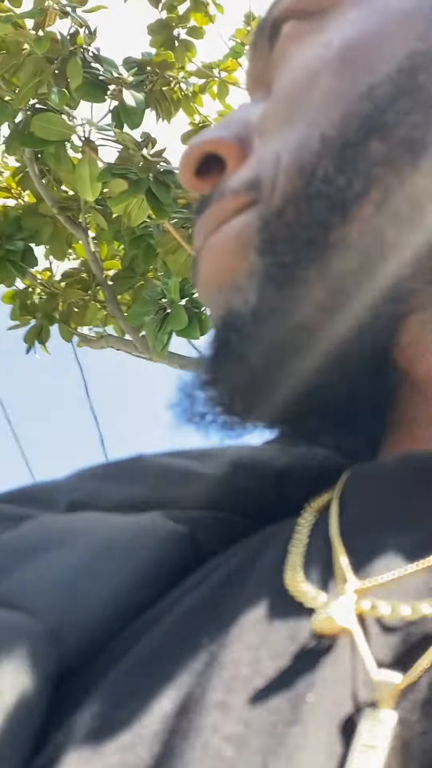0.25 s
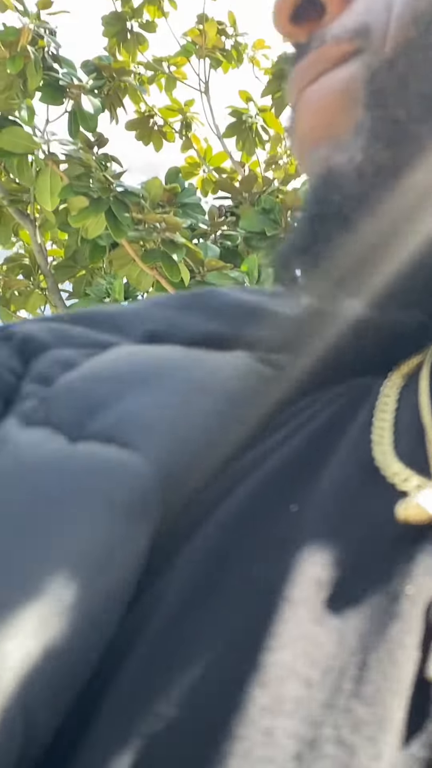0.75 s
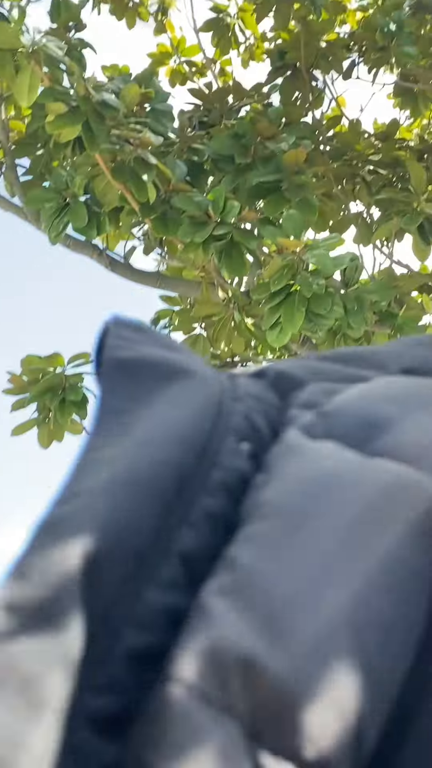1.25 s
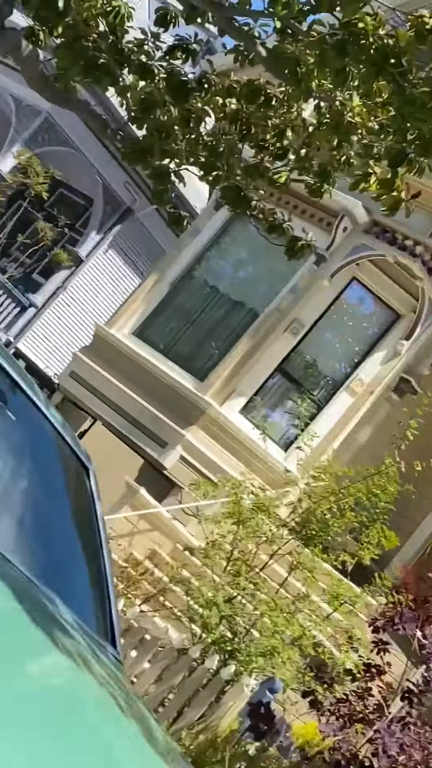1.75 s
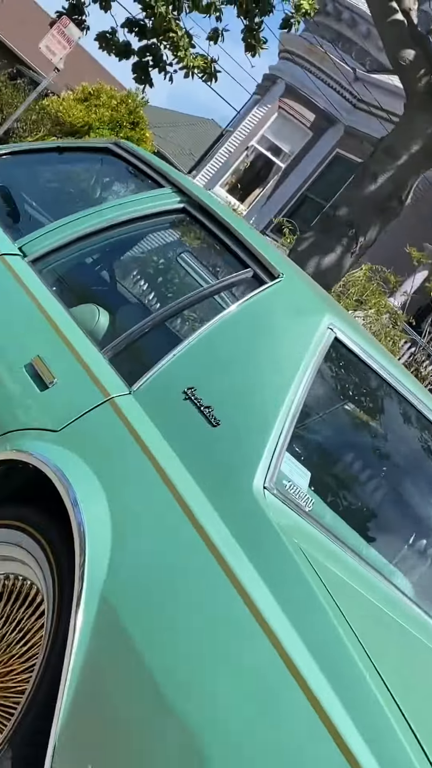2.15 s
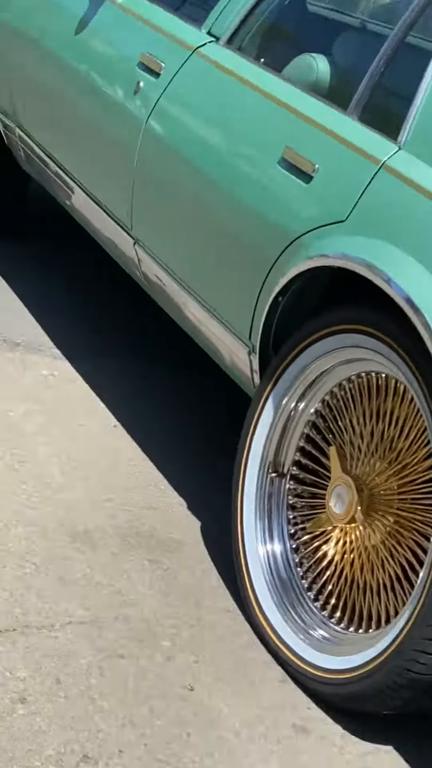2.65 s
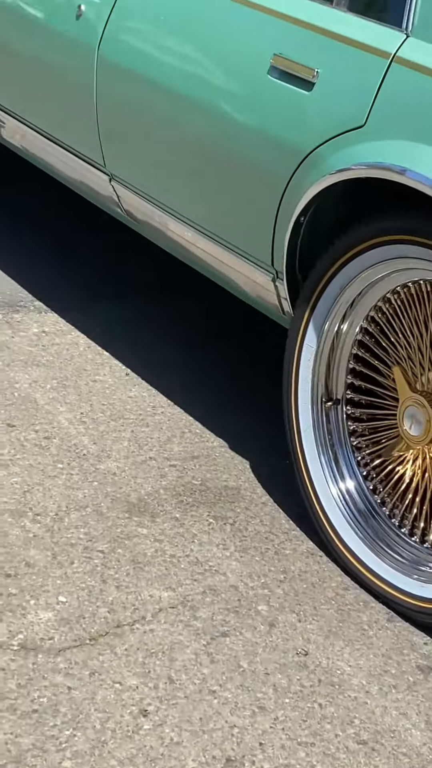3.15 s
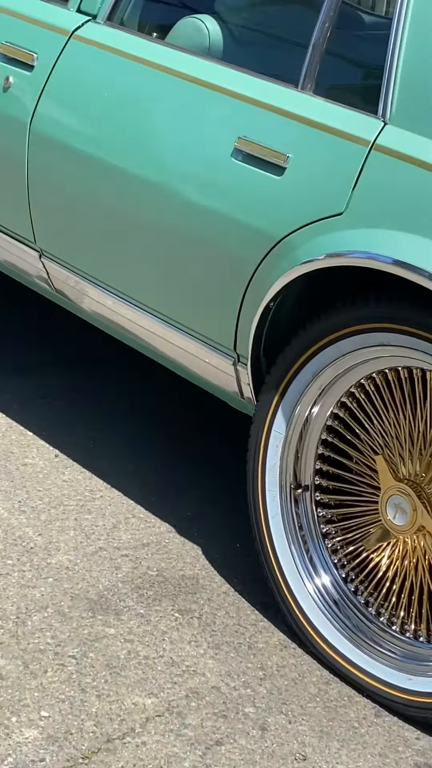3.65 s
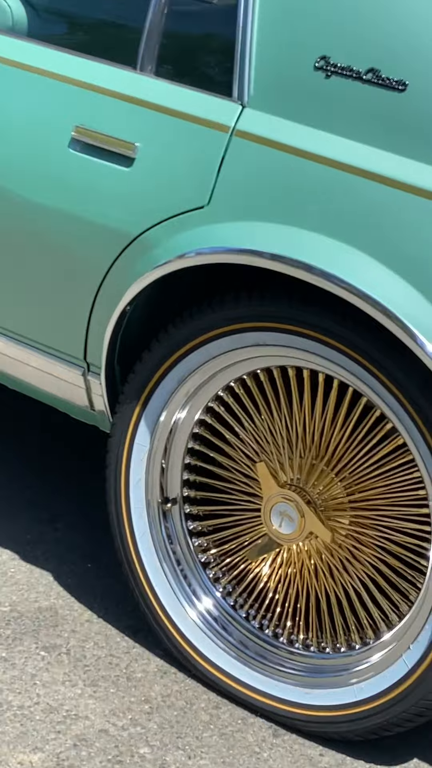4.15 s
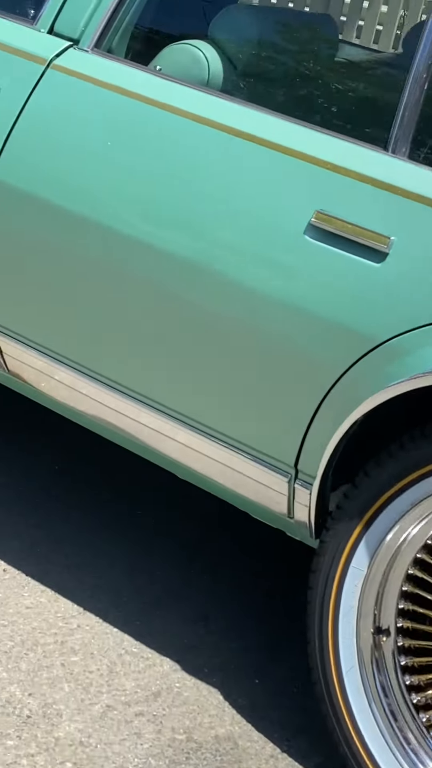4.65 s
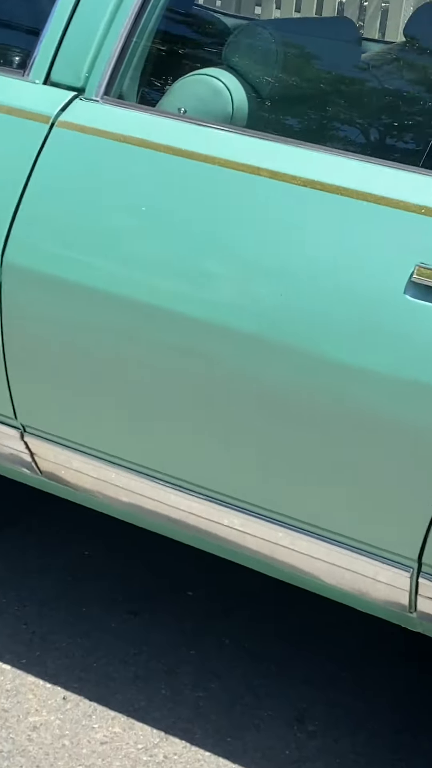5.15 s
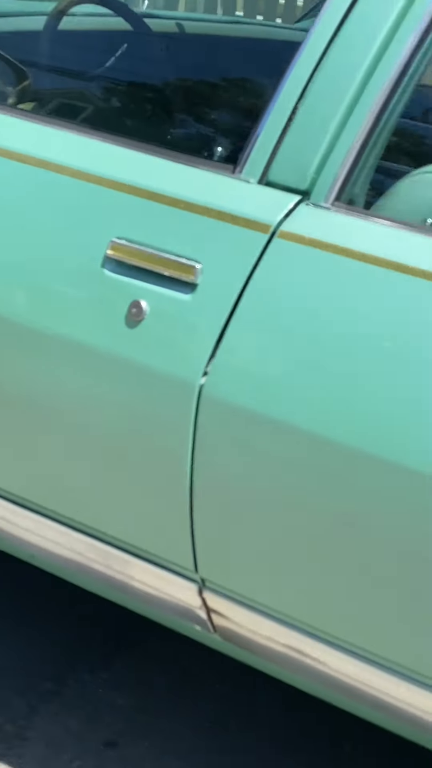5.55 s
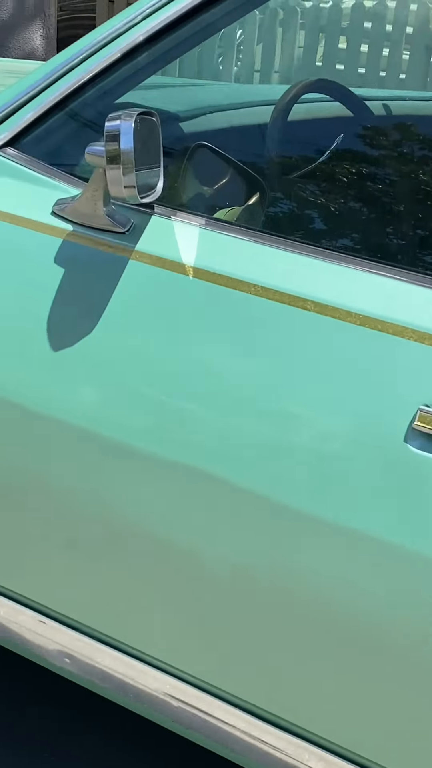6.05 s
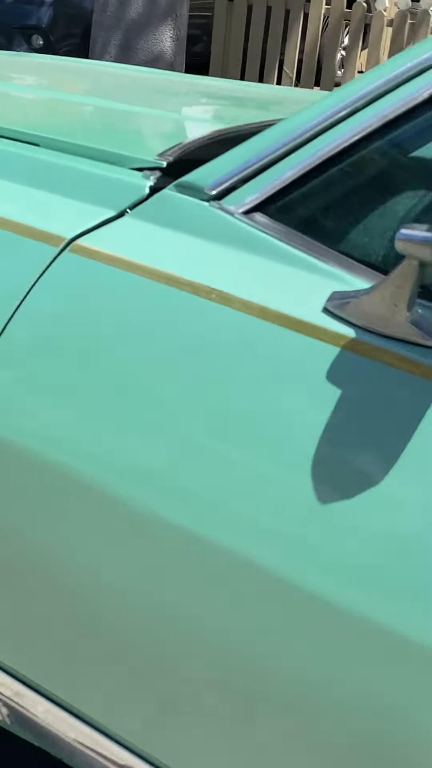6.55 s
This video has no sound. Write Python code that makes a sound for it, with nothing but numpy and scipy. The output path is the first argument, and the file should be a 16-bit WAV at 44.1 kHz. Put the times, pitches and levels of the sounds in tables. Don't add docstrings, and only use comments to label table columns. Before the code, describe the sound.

A big car engine idles in a deep throbbing drone outdoors, hiss growing brighter as the phone moves along, with finger knocks on its body.

```python
import sys
import numpy as np
from scipy import signal
from scipy.fft import rfft, irfft
from scipy.io import wavfile
from scipy.ndimage import uniform_filter1d

SR = 44100
rng = np.random.default_rng(int(sys.argv[2]) if len(sys.argv) > 2 else 0)


def waveform_to_disk(signal):
    frames = np.transpose(np.atleast_2d(signal))
    scaled = np.clip(frames, -1, 1) * 32767
    samples = np.round(scaled).astype(np.int16)
    wavfile.write(sys.argv[1], SR, samples)


def gain_from_db(level_db):
    decades = np.asarray(level_db, float) / 20
    return 10 ** decades


N = 299086

# time in seconds, nearness to the engine bay 0-1,
# clear view of the tailpipe 0-1, microphone ports aimed at the open street 0-1.
WALK_PATH = [
    (0, 0.02, 0.02, 0.3),
    (.6, 0.11, 0.1, 0),
    (.95, 0.13, 0.42, 0.6),
    (1.5, 0.26, 0.85, 0.9),
    (2.1, 0.66, 0.85, 0.1),
    (2.8, 0.59, 0.92, 0.46),
    (3.9, 0.76, 0.85, 0.1),
    (5.2, 0.97, 0.62, 0),
    (5.7, 0.95, 0.6, .4),
    (6.79, .97, 0.03, 0.47),
]
# start in seconds, peak in dB, pitch in Hz, length in cycles.
FINGER_KNOCKS = [(1.012, -19, 467, 4.3), (1.506, -24, 509, 5.0), (1.635, -10, 490, 4.3),
                 (1.822, -25, 500, 5.1), (1.901, -16.5, 498, 3.7), (1.965, -26.5, 530, 9.1),
                 (2.003, -32.5, 506, 5.6), (2.074, -26, 549, 5.7), (2.159, -26, 475, 12),
                 (2.235, -24.5, 538, 5.3), (2.298, -32, 573, 4.6), (2.42, -20, 507, 5),
                 (2.441, -24, 547, 5.1), (2.465, -23.5, 503, 8.5), (2.553, -28.5, 479, 8.6),
                 (2.59, -24, 496, 5.0), (2.609, -30, 567, 8.5), (2.903, -24, 506, 4.4),
                 (4.418, -33, 514, 8.5), (4.836, -25, 580, 4.6), (6.42, -29, 560, 6.),
                 (6.505, -27, 502, 6.)]
BOOM_DELAY = (.1374, -.73)


def evened(x):
    return x / np.sqrt(np.mean(x ** 2) + 1e-20)


def read(points, hz):
    f, value = np.transpose(points)
    return np.interp(np.log(hz + 1), np.log(f + 1), value)


def along(rows, t):
    s, *columns = np.transpose(rows)
    return [np.interp(t, s, column) for column in columns]


def add(mix, s, sound):
    part = mix[round(s * SR):][:len(sound)]
    part += sound[:len(part)]


def wander(hz):
    draws = rng.standard_normal(N // 100 + 402)
    smooth = signal.filtfilt(*signal.butter(2, hz * 200 / SR), draws)
    return evened(smooth[200:-200])


def stretched(slow):
    return np.interp(np.arange(N) / 100, np.arange(len(slow)), slow)


def pipe_gain(hz, mean_hz, pipe):
    centre_hz, width_hz = pipe
    mean_loss = 1 + (2 * (mean_hz - centre_hz) / width_hz) ** 2
    loss = 1 + (2 * (hz - centre_hz) / width_hz) ** 2
    return np.sqrt(mean_loss / loss)


def orders(table, cycles, lag, rough, drift, pipe=(0, 1e9)):
    mean_rpm = 956
    delay, turn = lag
    out = np.zeros(N)
    burn = 1 + rough * (wander(5.7) + 1j * wander(10.0))
    cycle_hz = np.pad(np.gradient(cycles)[::100] * SR, (0, 2), "edge")[:len(burn)]
    for k, db, sign in table:
        shake = burn + drift * (wander(4.4) + 1j * wander(2.4))
        shake = stretched(shake * pipe_gain(k * cycle_hz, k * mean_rpm / 120, pipe))
        line = sign * shake * np.exp(1j * (2 * np.pi * k * (cycles - delay) + turn))
        out += np.sqrt(2) * gain_from_db(db) * line.real
    return out


def crank_cycles():
    # time in seconds, crank speed in rpm.
    idle_speed = [(0, 960.9), (.59, 960), (.7, 978), (.83, 954.7), (1.7, 947.8), (2.08, 982), (2.54, 933.5),
                  (2.9, 963), (3.68, 941.7), (3.87, 959.5), (4.38, 963.2), (4.55, 939.3), (5.17, 967.5),
                  (5.81, 943.7), (6.14, 971.6), (6.32, 968.8), (6.62, 945.3), (6.79, 950)]
    rpm = along(idle_speed, np.arange(N) / SR)[0]
    return np.cumsum(rpm) / (120 * SR)


def whine():
    # frequency in Hz, level in dB.
    lines = [(11896, -87.5), (12104, -88)]
    t = np.arange(N) / SR
    return sum(np.sqrt(2) * gain_from_db(db) * np.sin(2 * np.pi * hz * t) for hz, db in lines)


def steps():
    # start in seconds, peak in dB, pitch in Hz.
    footfalls = [
        (2.53, -24.5, 47.5),
        (4.422, -26, 52.5),
        (5.599, -17.5, 54.8),
    ]
    rise_s = .022
    out, t = np.zeros(N), np.arange(6000) / SR
    for s, db, hz in footfalls:
        swell = t / rise_s * np.exp(1 - t / rise_s)
        add(out, s, gain_from_db(db) * swell * np.sin(2 * np.pi * hz * t))
    return out


def knocks():
    thump_db, thump_pitch = -9, .55
    out = np.zeros(N)
    for s, db, hz, turns in FINGER_KNOCKS:
        u = np.arange(0, 1, hz / (SR * max(turns, 2)))
        body = np.cos(2 * np.pi * turns * u - .9)
        shove = gain_from_db(thump_db) * np.sin(2 * np.pi * thump_pitch * turns * u - .6)
        add(out, s - .0015, gain_from_db(db) * np.sin(np.pi * u ** 0.74) ** 2 * (body + shove))
    return out


def rubbing():
    # start in seconds, level in dB, centre in Hz.
    scrapes = [
        (1.9602, -32.5, 890),
        (4.035, -31.5, 1310),
        (4.044, -30, 1000),
    ]
    start_s, rise_s, end_s, fall_s = 1.5, 0.36, 2.63, .04
    rub_db, width_hz = -42.5, 170
    t = np.arange(N) / SR
    hz = along(FINGER_KNOCKS, t)[1]
    press = np.clip((t - start_s) / rise_s, 0, 1) * np.clip((end_s - t) / fall_s + 1, 0, 1)
    slips = rng.standard_normal(N) * gain_from_db(3.5 * stretched(wander(45.)))
    turn = np.exp(2j * np.pi * np.cumsum(hz) / SR)
    r = np.exp(-np.pi * width_hz / SR)
    body = (turn * signal.lfilter([1], np.poly([r, r]), slips / turn)).real
    out = gain_from_db(rub_db) * press * evened(body)
    for s, db, centre_hz in scrapes:
        band = signal.butter(2, [centre_hz * .5, centre_hz * 1.6], "bandpass", fs=SR)
        puff = evened(signal.lfilter(*band, rng.standard_normal(250)))
        add(out, s, gain_from_db(db) * puff * np.hanning(250))
    return out


def accessories(cycles):
    # order of the two-turn cycle, level in dB, polarity.
    fan_blades = [(47, -5, 1), (48, 0, 1)]
    # frequency in Hz, level in dB.
    pump_tones = [(1253, -63), (1336, -60), (1657, -63), (2432, -64), (2538, -62.5), (2605, -63)]
    fan_db, fan_far_db, pump_far_db = -45, -9.5, -14
    t = np.arange(N) / SR
    near, view, _ = along(WALK_PATH, t)
    fan = orders(fan_blades, cycles, BOOM_DELAY, rough=.2, drift=0.28)
    fan *= gain_from_db(fan_db + fan_far_db * (1 - near * (1 - view)))
    pump = orders([(hz, db, 1) for hz, db in pump_tones], t, (0, 0), rough=.2, drift=.4)
    return fan + gain_from_db(pump_far_db * (1 - near)) * pump


def engine_noise(cycles):
    # frequency in Hz, density in dB per Hz.
    tail_spectrum = [(50, -44.5), (75, -40.5), (135, -53), (170, -62), (250, -55.5), (340, -63.5),
                     (500, -76), (750, -80), (1400, -87), (2500, -90.5), (5000, -96.5), (8000, -99.5),
                     (12000, -110), (15000, -124)]
    # frequency in Hz, density in dB per Hz.
    bonnet_spectrum = [(50, -62.5), (75, -42.5), (135, -47), (170, -54.5), (250, -53.5), (340, -64.5),
                       (500, -71), (750, -69.5), (1400, -74), (2500, -75.5), (5000, -80), (8000, -84.5),
                       (12000, -97.5), (15000, -107)]
    # centre in Hz, width in Hz, lift in dB.
    sheet_metal = [(72, 27, -6), (136, 22, -8), (243, 14, -8), (350, 16, -0.5), (376, 7.3, 3.5),
                   (560, 230, 4.5), (1400, 310, 1), (1520, 200, 1.5), (2166, 170, 3), (2694, 430, 3.5),
                   (5120, 810, 2)]
    patchy_db, flicker_db, aim_db, valves = 0.68, 0.46, 6.5, 0.047
    grille_db, grille_hz, grille_wide_hz = 1.5, 2350, 500

    frames, hz = N // 128 + 6, np.fft.rfftfreq(512, 1 / SR)
    near, view, aim = along(WALK_PATH, np.arange(frames) * 128 / SR)
    patches = rng.standard_normal((frames, 257)).T
    quick = uniform_filter1d(uniform_filter1d(patches, size=6, axis=0), size=24, axis=1)
    patches = evened(quick)
    slow = uniform_filter1d(uniform_filter1d(patches, size=8, axis=0), size=90, axis=1)
    patches += 0.59 * evened(slow)
    flicker = evened(uniform_filter1d(rng.standard_normal(frames), size=5))
    treble = np.clip(np.log2(hz / 700 + 1e-9), 0, 1)[:, None]
    top = np.clip(hz / 9000, 0, 1.5)[:, None]

    change_db = (near - 1) * (read(bonnet_spectrum, hz) - read(tail_spectrum, hz))[:, None]
    grille = np.exp(-((hz[:, None] - grille_hz) / grille_wide_hz) ** 2)
    change_db += grille_db * near * (1 - view) * grille
    change_db += aim_db * aim * top + patchy_db * patches + flicker_db * treble * flicker

    fine = np.fft.rfftfreq(N, 1 / SR)
    metal_db = sum(db / (1 + (2 * (fine - f) / w) ** 2) for f, w, db in sheet_metal)
    colour = gain_from_db(read(bonnet_spectrum, fine) + metal_db) * np.sqrt(SR / 2)
    colour *= np.clip(fine / 45, 0, 1) ** 2.4
    rush = irfft(rfft(rng.standard_normal((2, N))) * colour, N)
    z = signal.stft(rush, nperseg=512, noverlap=384)[2]
    z = z * gain_from_db(change_db)[:, :z.shape[2]]
    noise = signal.istft(z, nperseg=512, noverlap=384)[1][:, :N]
    return noise * (1 + valves * np.cos(2 * np.pi * (2 * cycles + 0.069)))


def exhaust(cycles):
    # order of the two-turn cycle, level in dB,
    # polarity (1j is a quarter turn ahead).
    main_boom = [(12, -13.5, 1), (13, 0, 1), (14, -19, -1), (15, -26, -1)]
    beating_boom = [(10, -16, -1), (11, 0, 1)]
    even_firing = [(5, -53, 1), (6, -46, -1), (7, -46, -1), (8, -29.7, 1), (19, -52, 1), (21, -50, 1)]
    burble_orders = [(24, -7, 1), (25, -9, 1j), (26, -3, 1), (27, -10, 1), (28, -13, 1)]
    ring_orders = [(34, -11, 1), (36, 0, 1), (37, -6, 1)]
    burble_delay = (.5332, .8)
    # centre in Hz, width in Hz.
    tailpipe = (203, 12.)
    silencer = (289, 11)
    # time in seconds, burn strength in dB, weaker bank against the stronger in dB.
    burn_strength = [(0, -9.5, -10.5), (.25, -13.5, -4.5), (.91, -13.5, -6), (1.08, -13, -13),
                     (1.56, -15, -10.5), (2.13, -17, -.3), (2.39, -14.5, -13), (2.96, -17.5, -2.5),
                     (3.11, -15, -7.5), (3.55, -18.5, -7.5), (3.9, -15.5, -9), (4.27, -17.5, -9.5),
                     (4.51, -16.5, -10.5), (4.79, -16, -11), (5.35, -15.5, -11), (5.72, -18, -8),
                     (6, -18.5, 0.5), (6.79, -14, -10)]
    # time in seconds, depth 0-1, half length in seconds.
    weak_burns = [
        (4.459, 0.8, 0.021),
        (5.567, 0.93, 0.012),
    ]
    t = np.arange(N) / SR
    main_db, weaker_db = along(burn_strength, t)
    near, view, _ = along(WALK_PATH, t)
    hidden = 1 - view
    burble_db = -26 - 16.5 * hidden
    ring_db = -38 - 5.5 * hidden + 3.5 * (near - .5)
    boom = gain_from_db(main_db) * orders(main_boom, cycles, BOOM_DELAY, rough=.03, drift=.07)
    boom += gain_from_db(main_db + weaker_db) * orders(beating_boom, cycles, BOOM_DELAY, rough=.04, drift=.07)
    for s, depth, half in weak_burns:
        boom *= 1 - np.clip(depth, 0, 1) * np.exp(-((t - s) / half) ** 2)
    firing = orders(even_firing, cycles, BOOM_DELAY, rough=.05, drift=.07)
    burble = orders(burble_orders, cycles, burble_delay, rough=.12, drift=.18, pipe=tailpipe)
    ring = orders(ring_orders, cycles, burble_delay, rough=.2, drift=.15, pipe=silencer)
    return boom + firing + gain_from_db(burble_db) * burble + gain_from_db(ring_db) * ring


def ports(direct, diffuse, close):
    # frequency in Hz, lead of the left port in radians.
    left_lead = [(100, 0), (300, -.15), (500, 0), (860, 1.15), (1150, 1.), (1380, -.05), (1850, .12),
                 (2600, 1.2), (3600, .4), (4300, .9), (4700, 2.), (4860, 3.14), (5250, 6.28), (5600, 6.4),
                 (5900, 7.), (10900, 8.6), (11800, 9.3), (12300, 9.425)]
    # frequency in Hz, left over right in dB.
    left_tilt = [(60, -.5), (160, -1), (250, -3), (500, -2), (750, 0), (1200, 8.5), (1600, 2.5), (1900, 0)]
    # frequency in Hz, likeness of the ports 0-1.
    likeness = [(250, 1.), (400, .93), (600, .88), (800, .9), (1200, .72), (1550, .995), (1850, .995),
                (2500, .97), (4500, .96), (5250, 1.), (5650, .99), (6000, .93), (11700, .8), (12400, .99)]
    hz = np.fft.rfftfreq(N, 1 / SR)
    same = np.clip(read(likeness, hz), 0, 1)
    f, lead = np.transpose(left_lead)
    half = gain_from_db(read(left_tilt, hz) / 2) * np.exp(.5j * np.interp(hz, f, lead))
    shared = rfft(close) + np.sqrt((1 + same) / 2) * rfft(direct)
    apart = np.sqrt((1 - same) / 2) * rfft(diffuse)
    return irfft(np.array([(shared + apart) * half, (shared - apart) / half]), N)


def scene():
    cycles = crank_cycles()
    direct, diffuse = engine_noise(cycles)
    handling = knocks() + rubbing() + steps()
    return ports(direct + accessories(cycles), diffuse, exhaust(cycles) + handling) + whine()


def low_pass(x):
    return signal.sosfilt(signal.butter(12, 15300, fs=SR, output="sos"), x)


def record(dry):
    return low_pass(dry)


dry = scene()
out = record(dry)
waveform_to_disk(out)
```